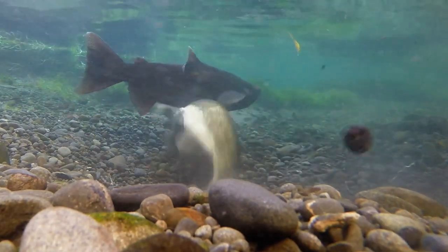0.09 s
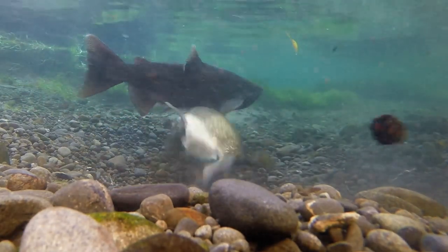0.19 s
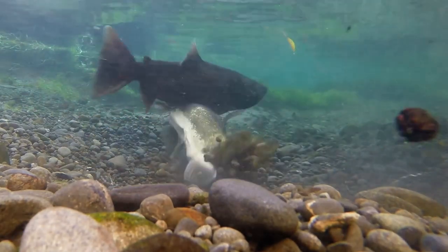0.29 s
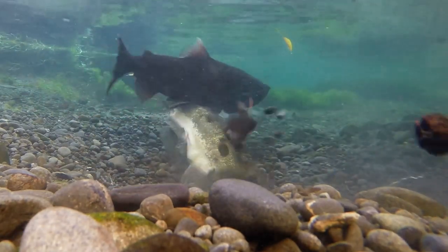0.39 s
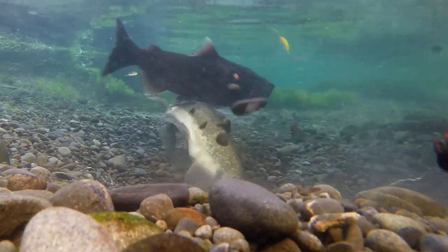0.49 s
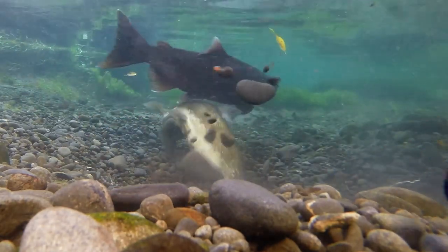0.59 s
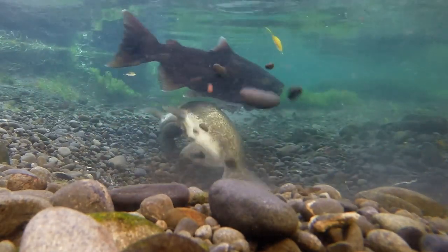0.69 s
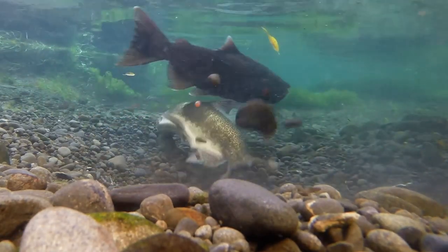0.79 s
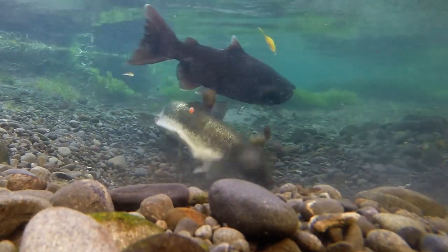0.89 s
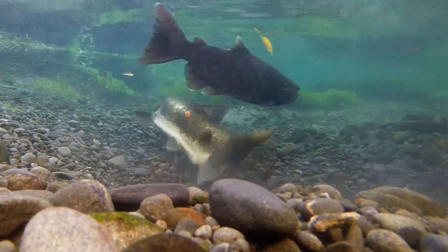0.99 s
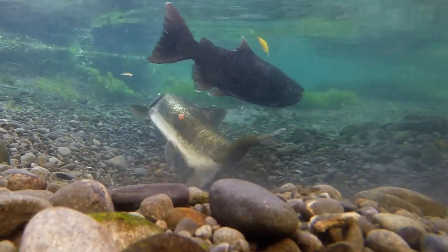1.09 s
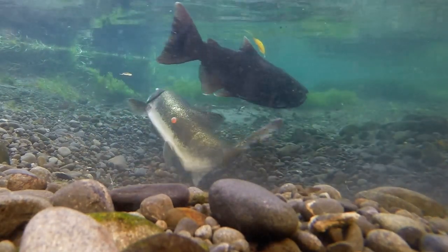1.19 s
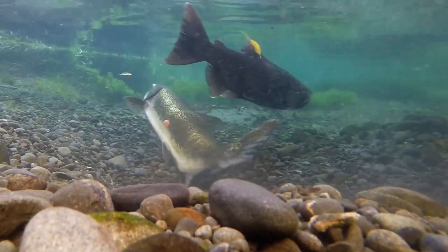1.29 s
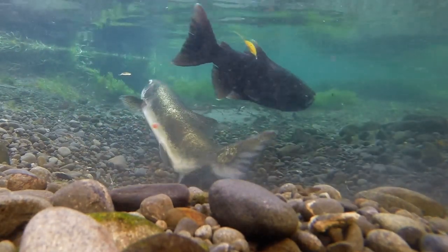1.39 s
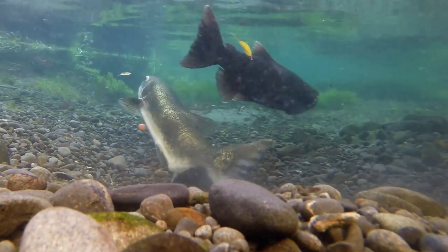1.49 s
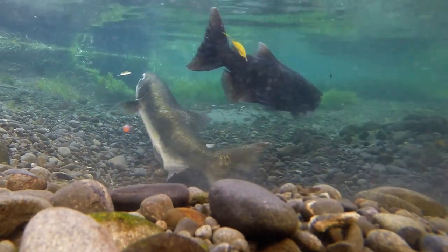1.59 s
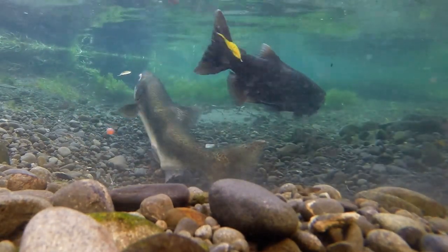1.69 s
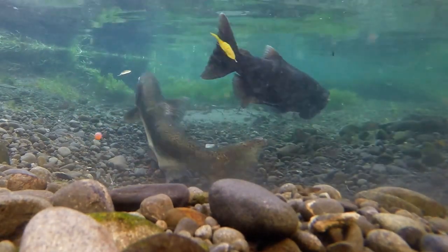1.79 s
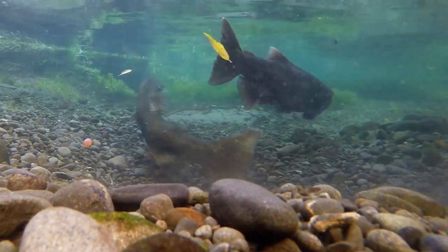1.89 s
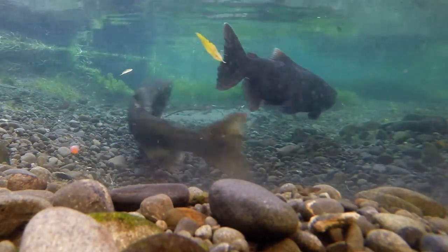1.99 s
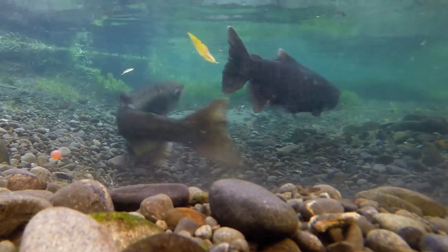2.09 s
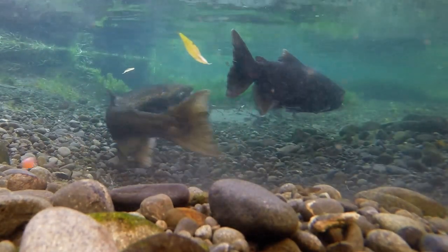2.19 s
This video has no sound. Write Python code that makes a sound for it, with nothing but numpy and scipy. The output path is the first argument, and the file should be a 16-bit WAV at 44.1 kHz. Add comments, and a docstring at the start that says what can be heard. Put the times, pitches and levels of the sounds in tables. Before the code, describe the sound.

Stones clack close by underwater as a fish digs with its tail, grit rattling thickly at first, then thinning to a few clicks; low surges bump the housed microphone over a faint steady current.

```python
"""Pebbles clack near a camera in a sealed housing, as a fish beats its tail on the bed of a shallow stream.
Each clack is a short burst of noise, coloured by the ringing of the housing shell.
Finer grit rattles between them: many small random clacks. The tail pushes low surges of water
against the housing, made as sine waves that swell and fade. Behind them, shaped noise makes the
hiss of the current, brief swells of treble and a low, lumpy churning."""
import sys
import numpy as np
from scipy import signal
from scipy.fft import rfft, irfft
from scipy.io import wavfile
from scipy.ndimage import uniform_filter1d, map_coordinates

SR = 44100
rng = np.random.default_rng(int(sys.argv[2]) if len(sys.argv) > 2 else 0)


def voltage_ratio(level):
    """Linear amplitude factor for a level in decibels (scalar or array-like)."""
    return 10 ** (np.asarray(level, float) / 20)


def master_out(mix):
    """Clip the mix to full scale and print it as 16-bit PCM to the path in sys.argv[1]."""
    frames = np.transpose(np.atleast_2d(mix))
    ceiling = np.clip(frames, -1, 1)
    pcm = np.round(ceiling * 32767).astype(np.int16)
    wavfile.write(sys.argv[1], SR, pcm)


N = 97020  # samples, 2.2 s

# Pebble clacks that stand out. Band levels are before the trims in BAND_TRIMS; the last three columns
# are relative to level_db: start_s, level_db (3.8-7.8 kHz), thud_db (below 1.3 kHz),
# body_db (1.3-3.8 kHz), edge_db (above 7.8 kHz)
PEBBLE_CLACKS = [(0.02, -40, -32, 7, 2.5), (0.036, -33.5, -25, -6, -11), (0.0774, -37, -25, -7, 0),
                 (0.0793, -34.5, -16, -6, -4), (0.0918, -38.5, -26, -9, 3), (0.0968, -39.5, -10, 7, -3),
                 (0.1117, -32, -28, -12, -13), (0.1173, -35, -16, -2, -7), (0.124, -38, -4, 3.5, -15),
                 (0.1442, -39, -4, 6, -10), (0.1599, -37.5, -12, 4, -14), (0.1637, -63, 28.5, 29, -1),
                 (0.1799, -29, -27, -6.5, -1.5), (0.203, -35, -15, 0, 2), (0.2066, -37.5, -18, 5.5, 4),
                 (0.2342, -24, -20, -8, 3), (0.2408, -29, -24, -20, 5), (0.247, -19.5, -35, -24, -4),
                 (0.2507, -23, -24, -4, -11), (0.2566, -23, -10, -5, -12), (0.258, -1.5, -19.5, -3, -22),
                 (0.2599, -16.5, -24, -9, 0.5), (0.2706, -23, -16, -13, 0), (0.2759, -23, -12, -7, -1),
                 (0.2815, -27, -20, 4, -12), (0.283, -22.5, -9, -12, -5), (0.291, -19, -13, -2, 1.5),
                 (0.2929, -19, -10, 11.5, -2), (0.3026, -15, -15.5, 1, -3), (0.305, -26, -21, -5, 4),
                 (0.3044, -30, -5, 3, 8), (0.3164, -30, -19, -21, -6), (0.3204, -19, -37, -20, 3.5),
                 (0.327, -33, -31, -19, -1), (0.334, -23, -25, -13, -7), (0.338, -21, -43, -11, -18),
                 (0.3392, -28, -34, -5, -9), (0.348, -25.5, -41, -16, -3), (0.3516, -23.5, -19, -12, -8),
                 (0.362, -31.5, -11, 5.5, -18), (0.3769, -37, -18, -1, -20), (0.412, -41.5, -9, 15, 4),
                 (0.429, -28, -7, -6, -5), (0.4447, -31, -32, -17, 1), (0.4524, -14, -15.5, -4.5, -10),
                 (0.46, -30, -21, -6, -2), (0.476, -22, -25, -10, -5), (0.508, -24, -20, 2, -6),
                 (0.513, -24, -11, -21, -13), (0.5234, -20, -24, 4, -24), (0.534, -27.5, -19, -12, -3),
                 (0.548, -11, -21, -4, -15), (0.5601, -13.5, -11, -3.5, -23), (0.566, -34, -15, -8, -12),
                 (0.5691, -25, -23, 3, 3), (0.5807, -17.5, -17, -9, -23), (0.5997, -26.5, -22, -3, 1.5),
                 (0.6181, -13, -39, -5.5, -14), (0.6329, -19.5, -15.5, -3, -4), (0.6478, -26, -23, -4, 1),
                 (0.6538, -27.5, -23, -12, -2), (0.668, -27.5, -23, -5, -7), (0.678, -22.5, -25, -3, -1.5),
                 (0.6895, -28, -12, -4, -11), (0.6922, -33, 6, 10.5, -12), (0.719, -26, -19, -2.5, -3),
                 (0.723, -30.5, -32, -20, 1), (0.7298, -26, -29, -6, -5), (0.74, -40, -19, 0, -5),
                 (0.7454, -38, -16, 6, -1), (0.7534, -22, -27, 2, -21), (0.758, -33, -7, 4, 0),
                 (0.801, -36, -29, -2, -4), (0.8062, -38, -28, 6.5, 2), (0.811, -37, -17, -13, -3),
                 (0.8133, -29, -10, 3.5, -12), (0.8208, -39.5, -8, 6, 1), (0.831, -37, -11, -8, -1),
                 (0.8381, -42, -17, 10, 8), (0.8499, -25.5, -32, -8.5, -22), (0.879, -25, -12, -1, -2),
                 (0.919, -35.5, -24, -4, 0), (0.9322, -36, -25, -3, -20), (0.9407, -29.5, -34, -1.5, -22),
                 (0.9571, -35, -15, -7, 0), (0.9775, -40, -14, 3, 4), (0.9988, -21, -17, -2.5, 0.5),
                 (1.0023, -32.5, -30, 10, -1), (1.0215, -20, -31, -2, -4), (1.0289, -29.5, -13, 6.5, -6),
                 (1.031, -23, -12, -11, -4), (1.034, -24.5, -24, -3.5, -8), (1.0508, -26.5, -5.5, 1, -8),
                 (1.059, -33, -22, -2, -9), (1.0759, -31.5, -23, 2, 6.5), (1.103, -32.5, -4, 6, 4),
                 (1.106, -11.5, -46, -4, 1), (1.1111, -28, -13, -11, 0), (1.1232, -20, -35, -10, -13),
                 (1.1574, -41, -20, 8, 3), (1.1829, -28, -21, -3.5, 2), (1.2009, -24.5, -35, -8, 1),
                 (1.2036, -28, -39, -5, 0), (1.211, -20.5, -45, -6, -6), (1.246, -32, -19, -7, 2.5),
                 (1.2569, -47.5, 13, -19, 9), (1.275, -37, -18, -8, 6), (1.277, -37.5, -20, -5, 4),
                 (1.2866, -47.5, 0, 11.5, 1), (1.301, -42, -20, -10, 1), (1.353, -32, -11, -9, -5),
                 (1.408, -44.5, -19, 2, -2), (1.4119, -47, -32, 4, 6.5), (1.4162, -43, -13, -20, -7),
                 (1.4322, -41.5, -19, -4, 3.5), (1.482, -42, -22, -6, -13),
                 (1.4931, -39.5, -16, -7.5, -7.5), (1.5319, -43, -20, -6, -3), (2.0562, -47, -1, 16.5, -12),
                 (2.0587, -42.5, -4, 5, -9), (2.0664, -51, -10, 15.5, -20), (2.0718, -45.5, -22, -5, 8),
                 (2.0733, -47, -2, 10, -10)]
# Clacks from the side, each band on its own, before the trims:
# start_s, thud_db, body_db, lower_middle_db (3.8-5.2 kHz), upper_middle_db (5.2-7.8 kHz), edge_db
SIDELONG_CLACKS = [(1.2624, -29, -11, -12, -30, -19), (1.8469, -58, -39, -23, -41, -36),
                   (1.8503, -60, -33, -34, -44, -45)]
# Fine grit in motion, a curve that the grains scatter around: time_s, level_db
GRIT_CURVE = [(0, -46.5), (.13, -50), (.222, -44.5), (.236, -31), (.31, -31.5), (.39, -38.5), (.46, -41),
              (.56, -41), (.67, -38), (.8, -43.5), (.97, -50.5), (1.02, -41.5), (1.08, -61), (1.12, -35),
              (1.17, -52.5), (1.27, -50), (1.42, -60.5), (1.6, -61)]
# Ringing notes of the housing shell: pitch_hz, width_hz, level_db
SHELL_RESONANCES = [(614, 270, -11.5), (1120, 300, -9.5), (1652, 363, -6.5), (2275, 273, -5.5),
                    (2707, 305, -2.5), (3286, 200, -10.5), (4830, 600, -7.5), (5940, 280, -2),
                    (6620, 590, 7.5), (8304, 840, 0), (9160, 710, -6), (9900, 940, -3), (12750, 670, -3.5),
                    (14300, 900, -13)]
# Borders between the five bands of a clack: border_hz
BAND_BORDERS = 1300, 3800, 5200, 7800
# Added to each band of every clack: trim_db for thud, body, lower middle, upper middle, edge
BAND_TRIMS = 13.1, 13.58, 1.16, 11.53, 13.8
# Water surges from the tail: centre_s, pitch_hz, level_db, length_s (centre to nearly gone)
TAIL_SURGES = [(.13, 110.5, -42, 0.032), (0.276, 51.6, -35, 0.024), (0.376, 73, -48, .06),
               (0.592, 73.6, -36, 0.055), (0.781, 76, -40.5, 0.073), (1.057, 63, -45, 0.028),
               (1.157, 49.7, -37, 0.047), (1.287, 100, -31.5, 0.024), (1.34, 138, -37.5, 0.011),
               (0.908, 425, -31, 0.0016), (2.113, 71, -52, 0.024)]
# Colour of the current's hiss, only its shape counts: pitch_hz, relative_level_db (per Hz)
CURRENT_COLOUR = [(12, -19), (35, -2.5), (220, -9.5), (700, -18), (1450, -20.5), (4000, -27.5), (9100, -35),
                  (14500, -40), (15300, -39), (15700, -62), (22050, -80)]
# Brief swells of the treble: centre_s, length_s, level_db
TREBLE_SWELLS = [(1.524, .025, -53.5), (1.794, 0.037, -56.5), (1.93, 0.13, -59.5), (2.016, 0.038, -50.5),
                 (2.177, 0.027, -49.5)]
# Colour of these swells, only its shape counts: pitch_hz, relative_level_db (per Hz)
TREBLE_COLOUR = [(20, -60), (3500, -27), (6500, -2), (10000, -6), (14000, -1.5), (15300, -3), (15700, -40),
                 (22050, -60)]
# Low turbulence while the fish digs, before the lumps: time_s, level_db
CHURN_CURVE = [(0, -51.5), (.2, -47.5), (.6, -47.5), (1.0, -50), (1.3, -44.5), (1.45, -67), (2.2, -69)]
# Colour of this turbulence, only its shape counts: pitch_hz, relative_level_db (per Hz)
CHURN_SHAPE = [(15, -44), (40, -18.5), (80, 2.5), (150, -5.5), (300, -19.5), (600, -12.5), (1200, -48)]


def shell_response(f, resonances):
    """The housing shell rings at several pitches; each resonance passes the sound near its own pitch."""
    return sum(voltage_ratio(db) * 1j * f * width / (hz * hz - f * f + 1j * f * width) for hz, width, db in resonances)


def clacks(start_s, bands_db, resonances=SHELL_RESONANCES):
    """Each contact is a snap, a short noisy blow and a chattering tail, rung through the shell."""
    size, lead = 1024, 64  # samples per clack, and room for what the filters spread ahead of it
    blow_t60_s = 0.0022  # time to fall by 60 dB
    settle_t60_s, settle_db = 0.026, -15.5  # the stones chatter as they settle
    snap = 2  # extra height of the first instant
    top_hz = 14600  # the microphone fades above this
    t = np.arange(size) / SR
    f = np.fft.rfftfreq(2 * size, 1 / SR)

    blow = voltage_ratio(-60 * t / blow_t60_s)
    settling = voltage_ratio(settle_db - 60 * t / settle_t60_s)
    fade_out = np.cos(np.pi / 2 * t / t[-1])
    contacts = rng.standard_normal((len(start_s), size)) * (blow + settling) * fade_out
    contacts[:, 0] += snap

    microphone = 1 / np.sqrt(1 + (f / top_hz) ** 24)
    rung = rfft(contacts, 2 * size) * shell_response(f, resonances) * microphone

    # Split the spectrum into five bands and bring each to its own level
    below = [1 / (1 + (f / hz) ** 10) for hz in BAND_BORDERS]
    shares = np.diff([0 * f, *below, 1 + 0 * f], axis=0)
    colour = 0
    for share, db, trim_db in zip(shares, bands_db, BAND_TRIMS):
        energy = np.mean(np.abs(rung * share) ** 2, axis=1)
        gain = voltage_ratio(db + trim_db) / np.sqrt(energy)
        colour = colour + share * gain[:, None]
    sound = np.roll(irfft(rung * colour), lead, axis=1)[:, :size]

    # Add every clack at its own moment
    at = np.round(start_s * SR).astype(int)[:, None] + np.arange(size)
    return np.bincount(at.ravel(), sound.ravel(), N + size)[lead:N + lead]


def pebbles():
    """The clacks that stand out; those from the side barely wake the shell's brightest resonances."""
    s, db, thud_db, body_db, edge_db = np.transpose(PEBBLE_CLACKS)
    facing = clacks(s, [db + thud_db, db + body_db, db, db, db + edge_db])

    missed_db = -14  # for resonances between 5200 and 7800 Hz
    dulled = [(hz, width, db + missed_db * (5200 < hz < 7800)) for hz, width, db in SHELL_RESONANCES]
    s, *bands_db = np.transpose(SIDELONG_CLACKS)
    return facing + clacks(s, bands_db, dulled)


def grit():
    """Many small contacts at random moments, a few larger than the rest."""
    end_s, grains_per_s = 1.6, 900
    base_db, size_db, scatter_db = -10, 4.5, 4  # over the curve, spread of sizes, scatter of each band
    count = int(grains_per_s * end_s)
    s = rng.uniform(0, end_s, count)
    grain_size = np.minimum(rng.exponential(size=count), 2.5)
    db = curve(GRIT_CURVE, s) + base_db + size_db * grain_size
    scatter = scatter_db * rng.standard_normal((len(BAND_TRIMS), count))
    tone_db = np.array([[-12], [1.5], [0], [0], [-4.5]])  # thud, body, two middles, edge
    return clacks(s, db + scatter + tone_db)


def surges():
    """Each push of water from the tail is a sine wave that swells and fades smoothly."""
    t = np.arange(N) / SR
    total = np.zeros(N)
    for centre_s, hz, db, length_s in TAIL_SURGES:
        swell = np.exp(-2 * ((t - centre_s) / length_s) ** 2)
        total -= voltage_ratio(db) * swell * np.sin(2 * np.pi * hz * (t - centre_s))
    return total


def unit(x):
    """Scale to an average strength (rms) of 1."""
    return x / np.sqrt(np.mean(x ** 2) + 1e-20)


def curve(rows, s):
    """Read (time, value) rows at times s, with straight lines between them."""
    return np.interp(s, *np.transpose(rows))


def noise(colour, patchy_db):
    """Coloured noise of rms 1, with random louder and softer patches in time and pitch."""
    z = signal.stft(rng.standard_normal(N), nperseg=512)[2]
    field = uniform_filter1d(rng.standard_normal(z.shape), size=6, axis=0)
    field = uniform_filter1d(field, size=10, axis=1)
    patchy = signal.istft(z * voltage_ratio(patchy_db * unit(field)), nperseg=512)[1][:N]
    f, db = np.transpose(colour)
    hz = np.fft.rfftfreq(N, 1 / SR)
    gain = voltage_ratio(np.interp(np.log(hz + 1), np.log(f), db))
    return unit(irfft(rfft(patchy) * gain, N))


def churning():
    """Low turbulence while the fish digs: deep noise whose level wanders in lumps."""
    lumps_per_s, lump_db = 23, 1
    t = np.arange(N) / SR
    knots = rng.standard_normal(int(t[-1] * lumps_per_s) + 4)
    lumps = map_coordinates(knots, [t * lumps_per_s])  # a smooth line through random points
    return voltage_ratio(curve(CHURN_CURVE, t) + lump_db * lumps) * noise(CHURN_SHAPE, patchy_db=2.0)


def treble_swells():
    """The treble swells briefly: patchy high noise, raised and lowered around each moment."""
    t = np.arange(N) / SR
    level = sum(voltage_ratio(db) * np.exp(-(2 * (t - s) / length_s) ** 4) for s, length_s, db in TREBLE_SWELLS)
    return level * noise(TREBLE_COLOUR, patchy_db=8)


def current():
    """Flowing water hisses steadily: noise that is strongest in the bass and weakens upwards."""
    return voltage_ratio(-47) * noise(CURRENT_COLOUR, patchy_db=1.5)


def scene():
    """All sources added together, one channel."""
    return (pebbles() + grit() + surges() + churning() + treble_swells() + current())[None]


def low_pass(x):
    """Removes everything above the highest recorded frequency."""
    return signal.sosfilt(signal.butter(12, 16480, fs=SR, output="sos"), x)


def record(dry):
    """The camera clips whatever goes beyond full scale."""
    clipped = np.clip(dry, -1, 1)
    return low_pass(clipped)


dry = scene()
out = record(dry)
master_out(out)
```